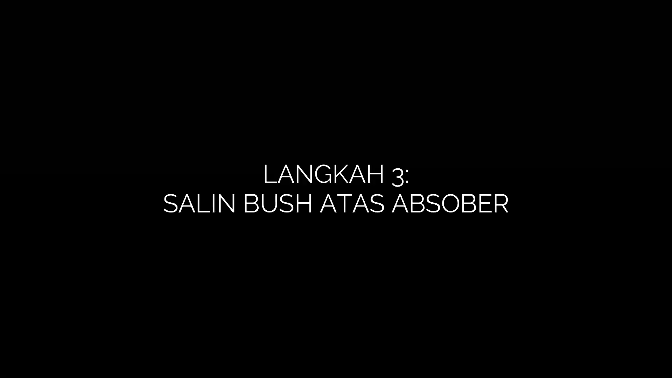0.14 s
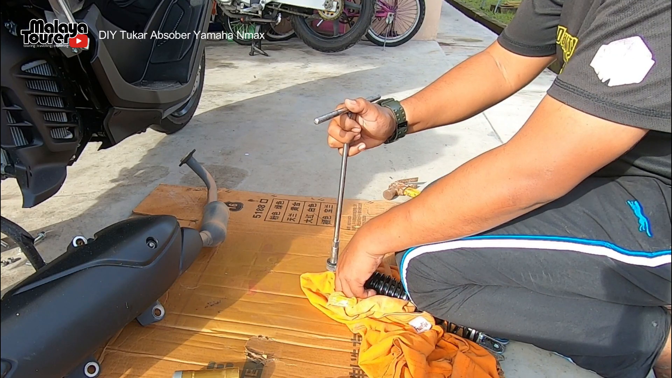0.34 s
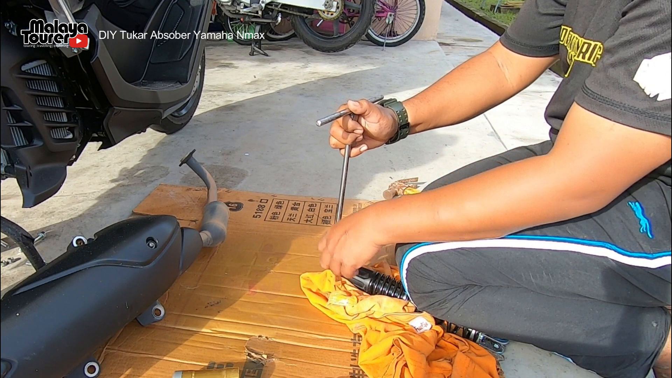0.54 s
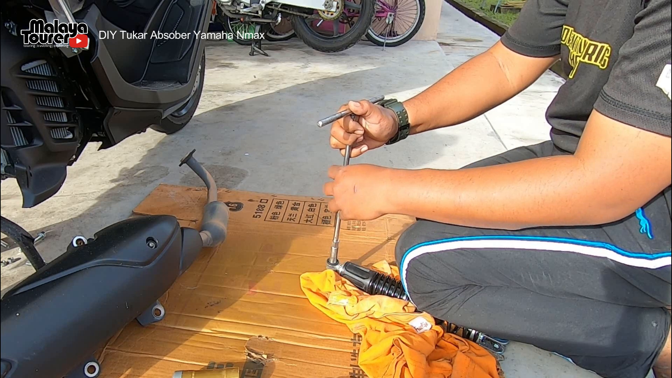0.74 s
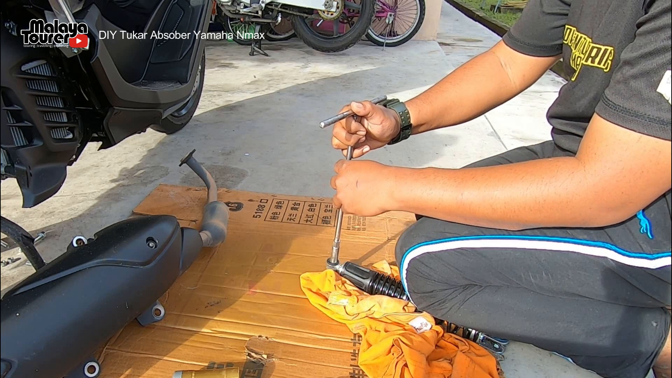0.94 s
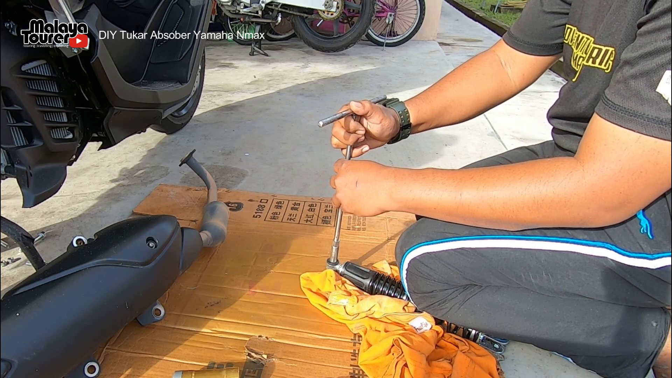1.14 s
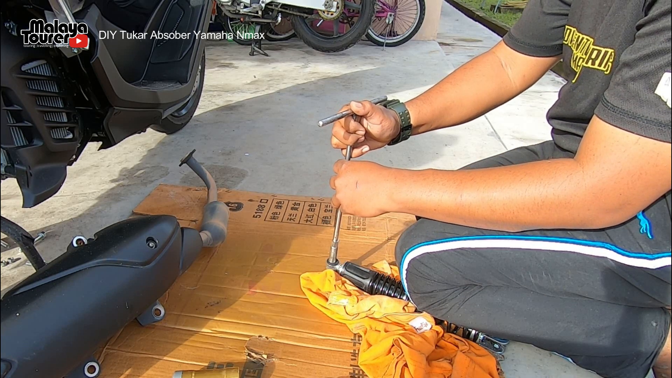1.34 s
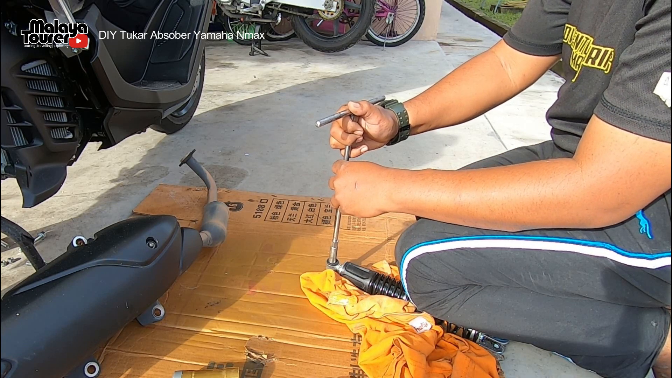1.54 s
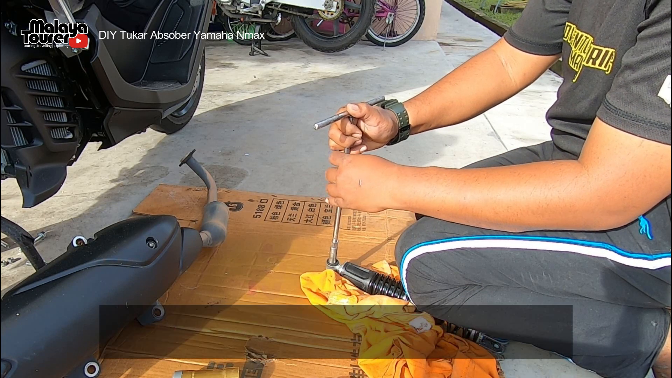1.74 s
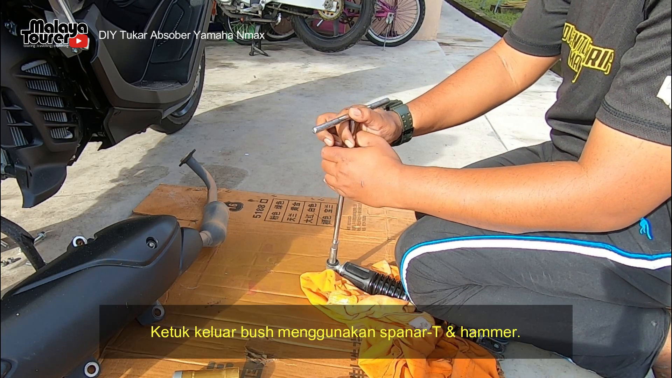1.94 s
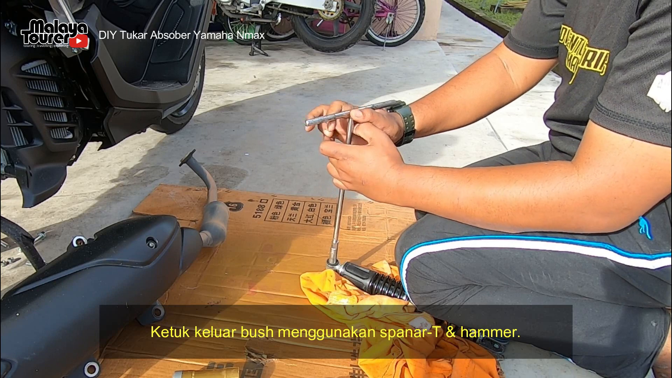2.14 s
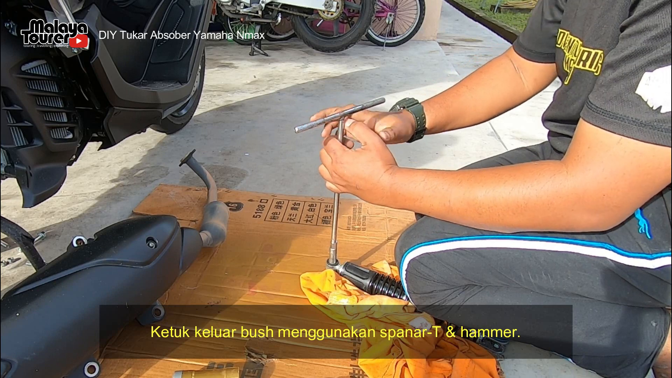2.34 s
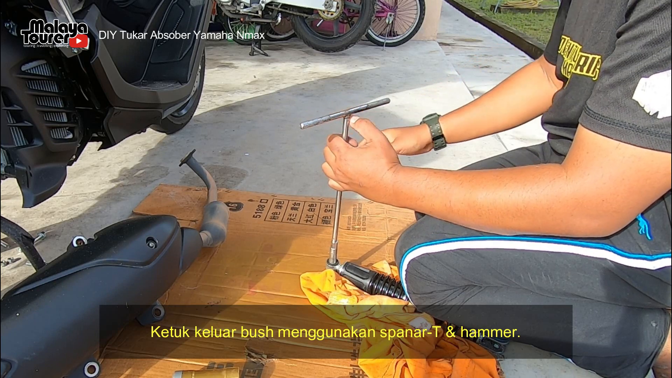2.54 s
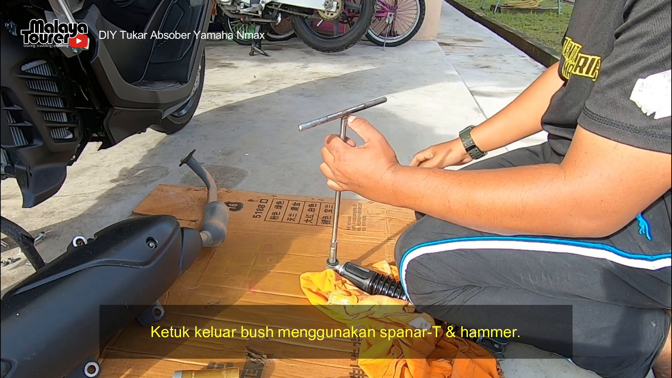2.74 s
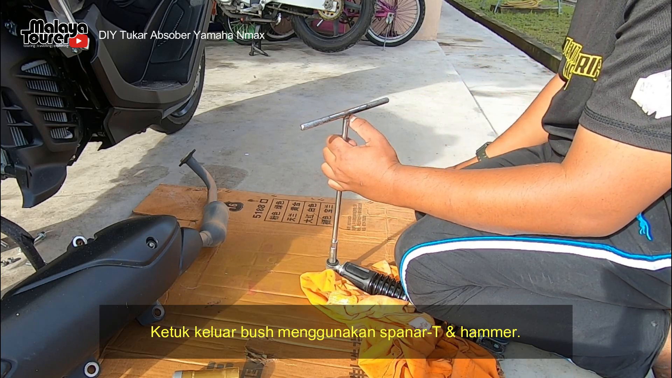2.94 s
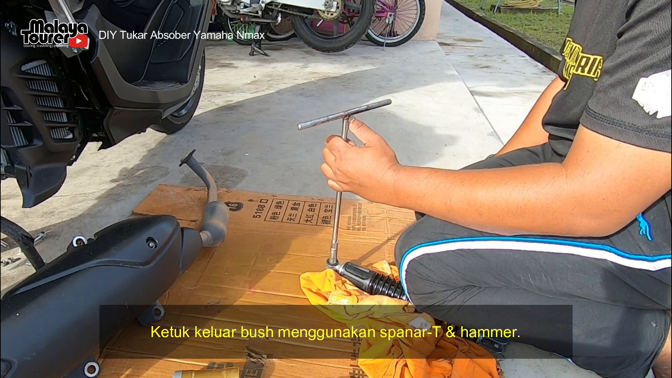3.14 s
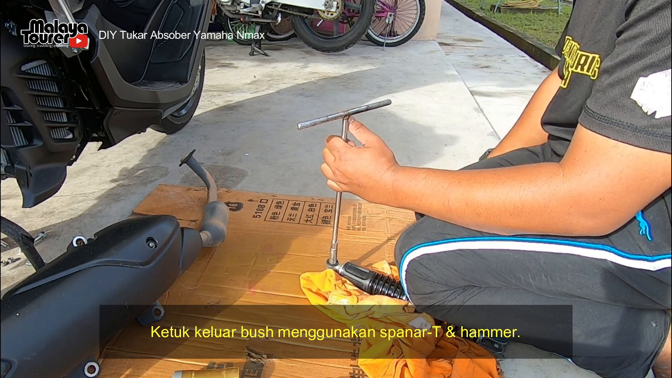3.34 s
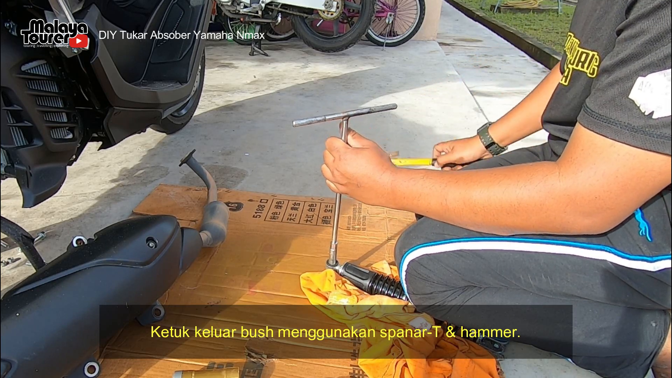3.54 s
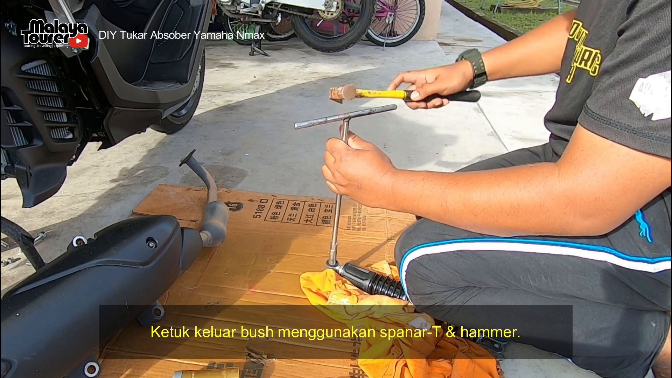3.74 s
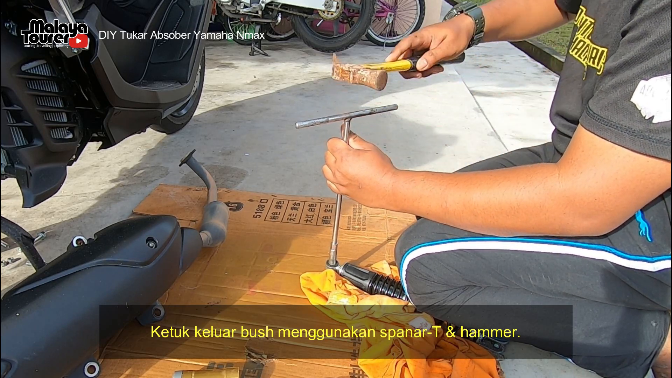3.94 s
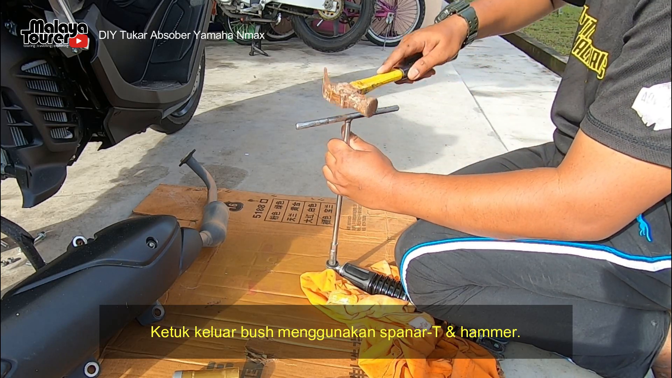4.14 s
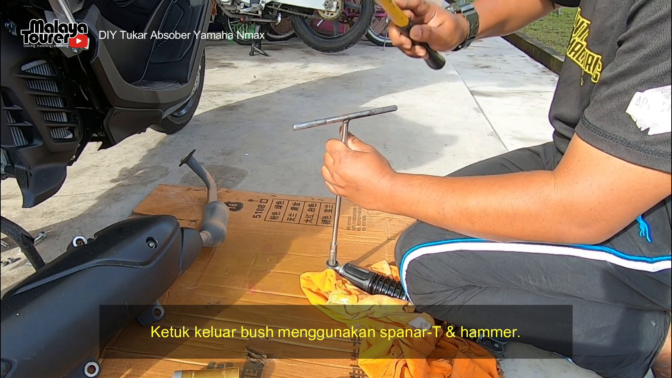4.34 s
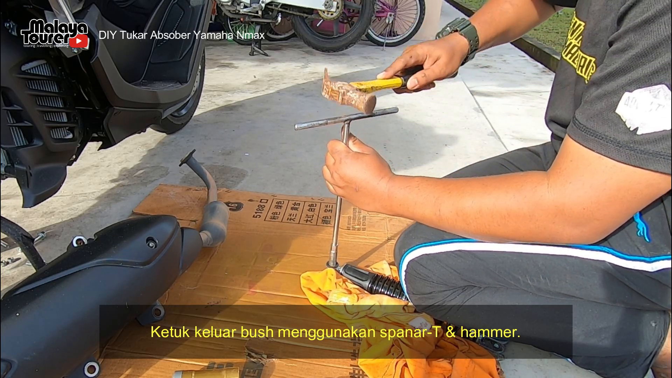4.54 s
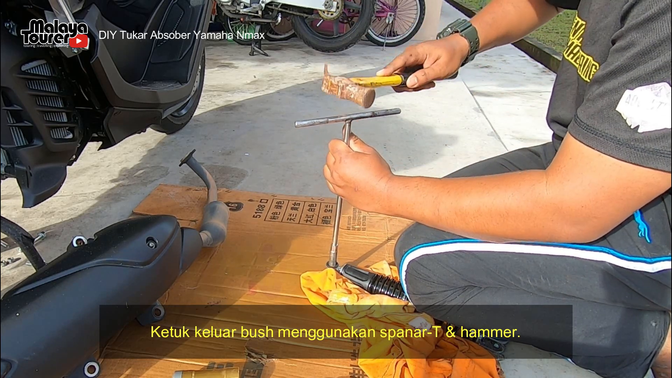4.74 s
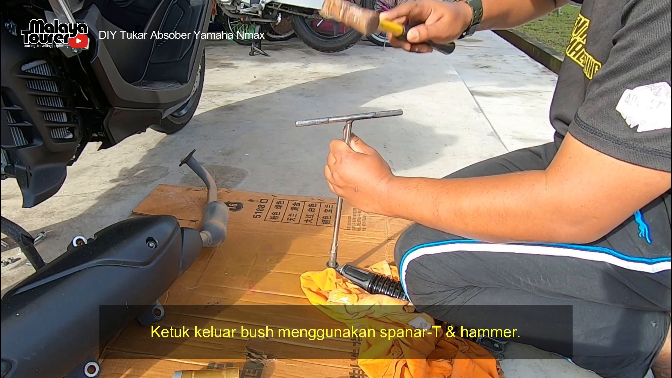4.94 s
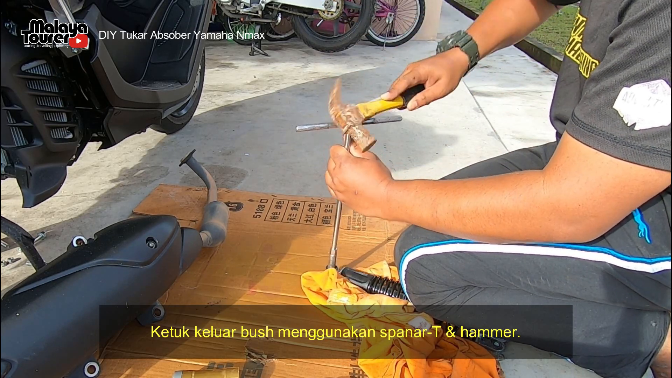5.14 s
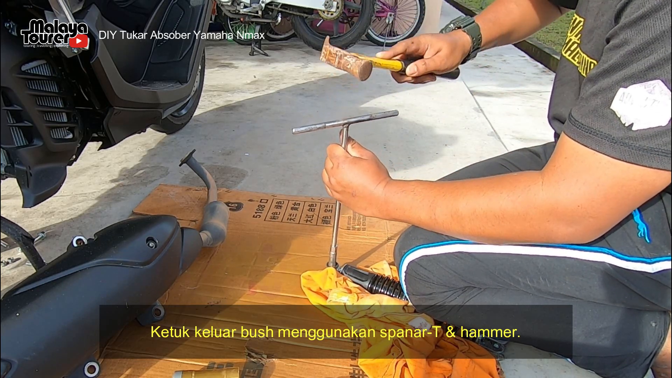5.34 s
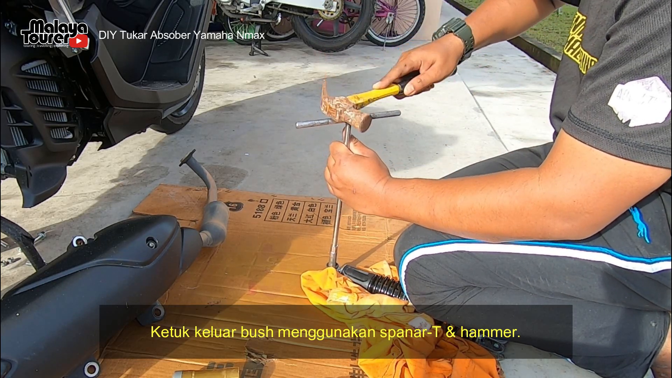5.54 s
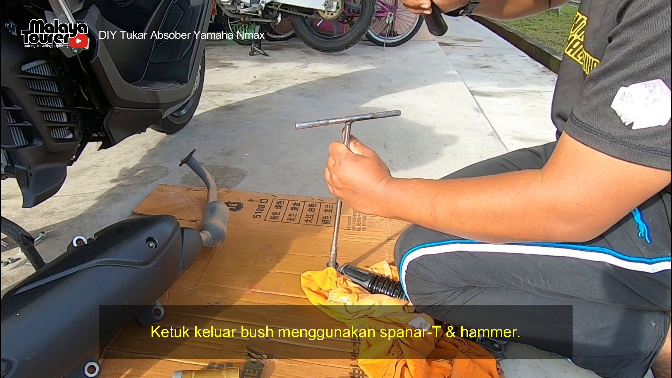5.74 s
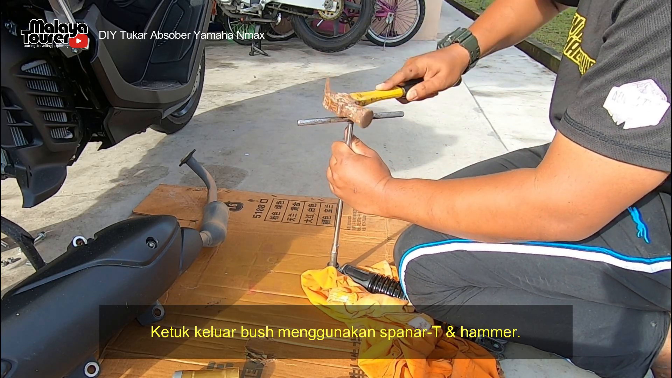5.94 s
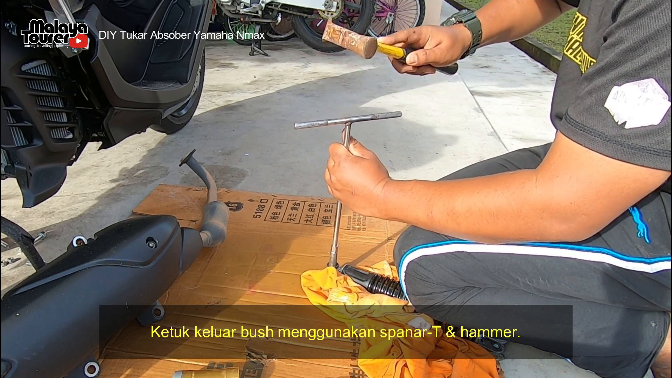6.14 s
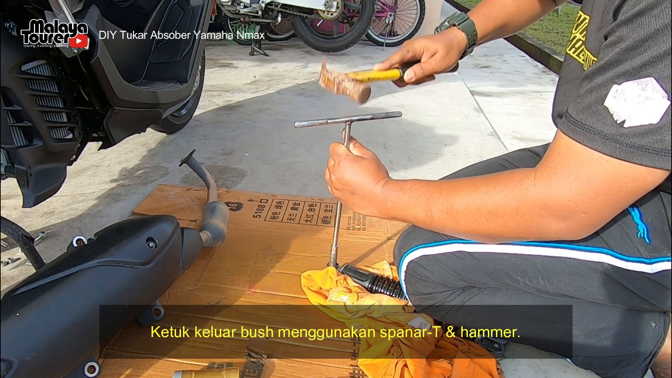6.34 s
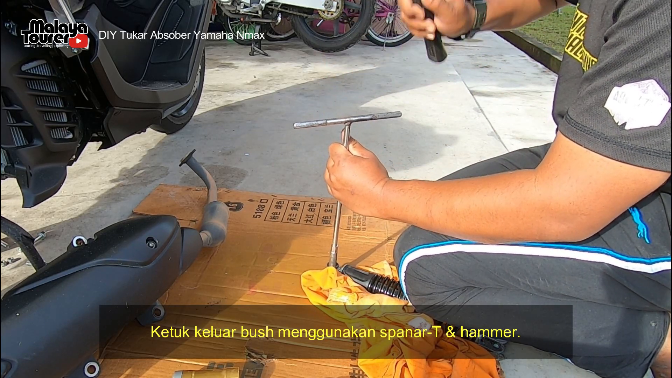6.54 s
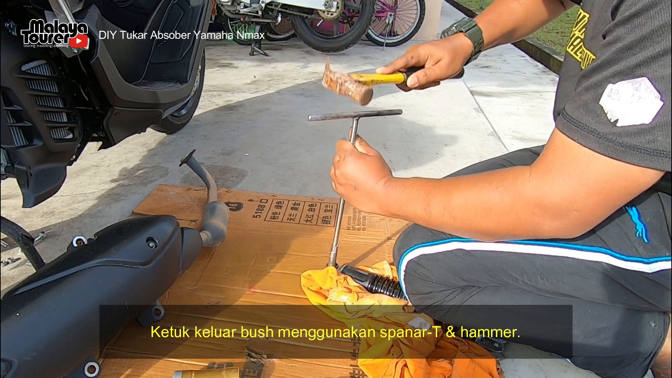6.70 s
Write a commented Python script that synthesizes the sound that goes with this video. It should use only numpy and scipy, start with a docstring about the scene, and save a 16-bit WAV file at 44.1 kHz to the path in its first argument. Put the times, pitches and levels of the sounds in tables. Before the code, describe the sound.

Outdoor repair work on a concrete porch by a street. Faint rustles of hands and cloth and dull tool knocks sit over steady engine rumble and tyre wash, with tiny bird and insect sounds. From the middle onward, eight sharp steel clinks alternate weak and strong, about three per second. Firm blows are very loud, right-weighted and limited, ducking the traffic and leaving long, level ringing tails.

```python
"""Traffic rumble and tyre wash (shaped noise) and a steady high sizzle run throughout, after a short silence.
A bird chirps twice (falling sines), an insect buzzes in swells (band noise), hands and tools tick and rustle.
Then a hammer taps a hand-held steel T-spanner eight times, lightly and firmly in turn, to drive a rubber
bush out of its eye: noise crack, damped modes, echoes, beating after-ring and a diffuse concrete-porch tail.
A limiter ducks each firm blow and recovers slowly, so its tail stays long and level."""
import sys
import numpy as np
from scipy import signal
from scipy.fft import rfft, irfft, next_fast_len
from scipy.io import wavfile

SR = 44100
rng = np.random.default_rng(int(sys.argv[2]) if len(sys.argv) > 2 else 0)


def wav_record(signal):
    """Record a signal, one row per channel, as 16-bit PCM in the file named by sys.argv[1]."""
    frames = np.transpose(np.atleast_2d(signal))
    bounded = np.clip(frames, -1, 1)
    # unit amplitude maps onto the largest positive 16-bit level
    quanta = np.round(bounded * 32767).astype(np.int16)
    wavfile.write(sys.argv[1], SR, quanta)


N = 302967

# traffic spectra, relative: (frequency [Hz], density [dB per Hz])
RUMBLE = [(20, -32), (35, -13.5), (55, -3), (78, 2.5), (98, -3), (120, 0.5), (148, -5), (185, 0),
          (240, -10), (350, -18.5), (600, -51), (1200, -76)]
WASH = [(200, 0), (400, 2.5), (600, 1.5), (850, -1.5), (1300, -10), (2200, -15), (3600, -18), (5500, -20.5),
        (8500, -27), (10300, -29.5), (11500, -44.5), (15000, -50)]
# vehicles passing far off: (nearest at [s], rumble lift [dB])
PASSES = [(.45, 2.5), (3.65, 2.5)]
# steady high noise bands: (centre [Hz], width [Hz], level [dB])
SIZZLE = [(6380, 660, -53.5), (7370, 780, -59.5), (9320, 800, -61)]
# swells of insect buzz: (centre time [s], length [s], level [dB])
BUZZ = [(.2, .1, -55), (.8, 0.3, -57), (1.2, 0.18, -61), (2.22, 0.27, -53.5), (3.453, 0.31, -54.5)]
# falling bird notes: (start [s], initial frequency [Hz], level [dB])
CHIRPS = [(.275, 6000, -50), (1.315, 6000, -49)]
# tool-handling ticks: (start [s], centre [Hz], level [dB])
TICKS = [(0.373, 650, -30), (.374, 3500, -46), (3.468, 800, -29.5), (3.535, 11800, -58)]
# hand and cloth rustles: (centre time [s], length [s], centre [Hz], level [dB])
RUSTLES = [(.92, 0.2, 2050, -54), (1.296, 0.13, 1390, -55), (1.927, 0.078, 2160, -54),
           (3.42, 0.2, 2000, -51)]
# hammer blows: (start [s], force [dB], contact brightness at 8 kHz [dB], pitch set by landing spot [Hz],
# its boost [dB], after-ring and tail [dB], crossbar ping [dB])
BLOWS = [(4.1763, 2.5, -9, 4220, 7, -3, -2), (4.5305, 17.5, 3.5, 4600, 0, -0.5, 1),
         (4.9048, 6.5, -5, 4100, -3.5, 0, -4), (5.2492, 20.5, 2, 3950, 0.5, -0.5, -1.5),
         (5.6455, 7, -2, 3900, -4.5, 0.5, -2.5), (5.9878, 24.5, 1.5, 3960, 1.5, 0, -2.5),
         (6.3725, 11, -2, 4100, 1.5, -0.5, 2.5), (6.7063, 19.5, 3.5, 3810, 6, -1.5, -2)]
# spanner and shock absorber modes, damped by hand and rubber:
# (frequency [Hz], direct level before blow colour [dB], t60 before DAMPING [s], excess over porch tail [dB])
SPANNER = [(271.8, -35, .15, 16.5), (454, -26, 0.07, -12), (550, -26.5, .035, -5), (986, -30.5, 0.095, 14),
           (1380, -30, 0.014, -1), (2100, -18.5, 0.014, -2.5), (2110, -34, 0.05, -3),
           (2337, -15, 0.0078, -11), (2680, -11, 0.011, 0), (3680, -6.5, 0.01, 2), (3730, -16, 0.05, 8),
           (3977, -7, 0.027, 9), (4297, -9, 0.013, -5), (4620, -8, 0.02, 5), (5076, -15.5, 0.053, 15),
           (5680, -10, 0.026, -12), (6530, -24.5, .025, 10), (6690, -19, 0.034, -7), (7500, -12, 0.053, 2),
           (9150, -30, 0.042, 9.5), (11650, -42, .04, 10), (11370, -28, 0.026, 0)]
# steel-on-steel crack, relative: (frequency [Hz], density [dB per Hz])
CRACK = [(200, -1.5), (700, -17), (1250, -3), (1650, -11.5), (2200, 1), (3000, -11.5), (3700, 2),
         (4300, -15), (5400, -8.5), (6600, -10.5), (8500, -21.5), (13000, -26.5), (16000, -46)]
# bare-steel after-ring modes: (frequency [Hz], level before RING_DB and blow colour [dB])
RING = [(972, -38), (1159, -43), (2046, -39), (2139, -41), (2585, -39), (3461, -38), (3515, -35),
        (3715, -36), (3765, -35), (3868, -34), (3902, -32), (3935, -35), (3974, -32), (4065, -35),
        (4245, -38), (4404, -37), (4533, -39), (4603, -35), (4785, -39), (5018, -30), (5071, -34),
        (5106, -35), (6492, -35), (6778, -40), (7736, -39), (7797, -41), (7838, -41), (9090, -48),
        (9130, -48), (10795, -52), (11190, -52), (11270, -51)]
# porch reverberation, relative: (frequency [Hz], density [dB per Hz], t60 [s])
PORCH = [(200, 4, 0.29), (580, 4, 0.27), (860, -9, 0.57), (1250, -3, 0.53), (2240, -4, 0.54),
         (3200, -2, 0.56), (3800, -0.5, 0.56), (5740, 0, 0.47), (7560, -2.5, 0.48), (10000, -11.5, 0.45),
         (10300, -22, 0.45), (12500, -20.5, 0.43), (14900, -48, 0.45)]
# first echoes from floor, walls and roof: (delay [s], level re direct [dB])
ECHOES = [(.0042, -36), (0.0127, -39), (0.0164, -12), (.0275, -24), (0.0293, -19)]
# left microphone port re right:
# (frequency [Hz], level [dB], phase lead [rad], likeness of diffuse sound [-1 to 1])
PORTS = [(55, -10.6, 0.0, .97), (125, -11.2, 0.0, .96), (205, -14.6, 0.0, .91), (370, -15.5, .6, .5),
         (550, -9, 2.6, .85), (1000, -1, 2.1, .93), (2100, -.5, 1.3, .78), (4000, -5, .55, .75),
         (6500, -14, .5, .35), (8500, -12, .6, .2), (11000, -4, .3, .2), (15000, -2, 0, .2)]

RUMBLE_DB, WASH_DB = -26, -37.5  # before passes and drift
PASS_HALF_WIDTH_S = 0.34
KNOCK_HZ, KNOCK_WIDTH_HZ, KNOCK_DB_PER_FORCE_DB = 2210, 650, 0.1241
DAMPING = 0.98  # divides SPANNER t60
PING_HZ, PING_WIDTH_HZ = 5060, 130  # crossbar mode cluster
RING_DB, RING_SPREAD_DB, RING_T60_S = 2, 2.5, .39
RING_BLUR_HZ = 7  # random spread of partials about each mode
SOUND_STARTS_S, CUTOFF_HZ = .207, 16400


def from_db(db):
    """Decibels to amplitude gain."""
    return 10 ** (np.asarray(db) / 20)


def unit_rms(x):
    """Scale to rms 1."""
    return x / np.sqrt(np.mean(x ** 2) + 1e-20)


def at_hz(table, hz):
    """Interpolate every table column on a log-frequency axis."""
    points, *columns = np.transpose(table)
    return [np.interp(np.log(hz + 1e-3), np.log(points), c) for c in columns]


def bins(size):
    """Bin frequencies [Hz] of a size-sample spectrum."""
    return np.fft.rfftfreq(size, 1 / SR)


def bell(x, centre, width):
    """Bell curve of height 1."""
    return np.exp(-((x - centre) / width) ** 2)


def add(track, start_s, sound):
    """Mix a sound into a track, cut at the end."""
    start = round(start_s * SR)
    part = sound[..., :N - start]
    track[..., start:start + part.shape[-1]] += part


def diffuse(gain, size):
    """Stereo noise of given spectral gain; mid/side balance sets the likeness of the two ports."""
    alike = np.clip(at_hz(PORTS, bins(size))[2], 0, 1)
    mid, side = rfft(rng.standard_normal((2, size)))
    common = np.sqrt((1 + alike) / 2) * mid
    opposed = np.sqrt((1 - alike) / 2) * side * [[1], [-1]]
    return irfft(gain * (common + opposed), size)


def hump(hz, width_hz, size):
    """Noise in one bell-shaped band, rms 1."""
    return unit_rms(diffuse(np.exp(-2 * ((bins(size) - hz) / width_hz) ** 2), size))


def drift(knots_per_s):
    """Random wander: straight lines between normal knots of spread 1."""
    knots = rng.standard_normal(1000)
    return np.interp(np.arange(N) / SR * knots_per_s, np.arange(len(knots)), knots)


def traffic(throb_db=0.88, waver_db=1.1, wash_share=0.53):
    """Far engine rumble under tyre wash: shaped noises of drifting level, swelling as vehicles pass."""
    t = np.arange(N) / SR
    lift_db = sum(peak_db / (1 + ((t - s) / PASS_HALF_WIDTH_S) ** 2) for s, peak_db in PASSES)
    rumble = unit_rms(diffuse(from_db(at_hz(RUMBLE, bins(N))[0]), N))
    wash = unit_rms(diffuse(from_db(at_hz(WASH, bins(N))[0]), N))
    rumble_db = RUMBLE_DB + lift_db + throb_db * drift(18)
    wash_db = WASH_DB + wash_share * lift_db + waver_db * drift(12.0)
    return rumble * from_db(rumble_db) + wash * from_db(wash_db)


def garden(buzz_hz=7620, buzz_width_hz=480, chirp_s=0.036, chirp_fall=0.076):
    """Steady band-noise sizzle, swelling band-noise insect buzz and sine bird notes gliding down."""
    t = np.arange(N) / SR
    out = sum(from_db(level_db) * hump(hz, width_hz, N) for hz, width_hz, level_db in SIZZLE)
    swell = sum(from_db(level_db) * np.exp(-2 * ((t - s) / length_s) ** 2) for s, length_s, level_db in BUZZ)
    out += swell * hump(buzz_hz, buzz_width_hz, N)
    along = np.linspace(0, 1, round(chirp_s * SR))
    for s, hz, level_db in CHIRPS:
        phase = 2 * np.pi * np.cumsum(hz * (1 - chirp_fall * along)) / SR
        add(out, s, from_db(level_db) * np.sin(np.pi * along) * np.sin(phase))
    return out


def handling(t60_s=0.064, tick_width_hz=1100, rustle_width_hz=550, touch_s=.0006):
    """Decaying noise ticks of tools and bell-shaped noise swells of fingers and cloth."""
    out, t = np.zeros((2, N)), np.arange(SR // 10) / SR
    for s, hz, level_db in TICKS:
        envelope = from_db(level_db - 60 * t / t60_s) * (1 - np.exp(-t / touch_s))
        add(out, s, hump(hz, tick_width_hz, len(t)) * envelope)
    for s, length_s, hz, level_db in RUSTLES:
        swell = bell(np.arange(N) / SR, s, length_s)
        out += from_db(level_db) * swell * hump(hz, rustle_width_hz, N)
    return out


def porch(tail_db=-21.5, build_s=0.0097):
    """Diffuse tail of a blow: spanner sound radiated all round returns as noise with modal humps."""
    size = SR
    t, hz = np.arange(size) / SR, bins(size)
    # a mode is wider the sooner it dies
    humps = sum(from_db(over_db) ** 2 / (1 + (2 * np.pi * (hz - mode_hz) * t60_s / np.log(1000)) ** 2)
                for mode_hz, _, t60_s, over_db in SPANNER)
    gain = from_db(at_hz(PORCH, hz)[0]) * np.sqrt(1 + humps)
    noise = rfft(unit_rms(diffuse(gain, size)))
    edges_hz = [0, 700, 3000, 5500, 7000, 9000, 12000, SR / 2]
    tail = np.zeros((2, size))
    for low, high in zip(edges_hz, edges_hz[1:]):
        t60_s = at_hz(PORCH, (low + high) / 2)[1]
        band = irfft(noise * ((hz >= low) & (hz < high)), size)
        tail += band * from_db(-60 * t / t60_s)
    return from_db(tail_db) * tail * np.clip(t / build_s, 0, 1) ** 2


def contact_tilt(hz, bright_db):
    """Treble tilt [dB]: harder contact is brighter."""
    return bright_db * np.minimum(hz / 8000, 1.5) ** 1.5


def ring_colour(hz, bright_db, favoured_hz, boost_db, after_db, ping_db, favoured_width_hz=220):
    """After-ring and tail colour [dB]: the landing spot weights one mode cluster and the crossbar ping."""
    spot_db = boost_db * bell(hz, favoured_hz, favoured_width_hz)
    crossbar_db = ping_db * bell(hz, PING_HZ, PING_WIDTH_HZ)
    return after_db + contact_tilt(hz, bright_db) + spot_db + crossbar_db


def ring(colour, count=3):
    """Bare-steel after-ring: each mode is a few close partials that beat, of new strength each blow."""
    hz, mode_db = np.transpose(RING)
    spread_db = RING_SPREAD_DB * rng.standard_normal(len(hz))
    level = from_db(RING_DB + mode_db + ring_colour(hz, *colour) + spread_db)
    # bins are 1 Hz apart
    partials = np.round(hz + RING_BLUR_HZ * rng.standard_normal((count, len(hz)))).astype(int)
    phase = np.exp(2j * np.pi * rng.random(partials.shape))
    spectrum = np.zeros(SR // 2 + 1, complex)
    np.add.at(spectrum, partials, level / np.sqrt(count) * phase)
    return irfft(spectrum, SR) * SR / 2 * from_db(-60 * np.arange(SR) / SR / RING_T60_S)


def modes(hz, level_db, t60_s, size):
    """Sum of decaying sines with alternating signs."""
    t = np.arange(size) / SR
    amplitude = from_db(level_db) * (-1) ** np.arange(len(hz))
    return amplitude @ (np.sin(2 * np.pi * hz[:, None] * t) * from_db(-60 * t / t60_s[:, None]))


def clink(force_db, bright_db, crack_db=-7.0, fade_t60_s=0.024, contact_s=0.00043, spread_db=2.5):
    """Direct blow: noise crack and damped modes, both rising with the hammer's contact time constant."""
    size = SR // 4
    t, (hz, mode_db, t60_s, _) = np.arange(size) / SR, np.transpose(SPANNER)
    # firmer blows knock harder
    knock_db = KNOCK_DB_PER_FORCE_DB * force_db * bell(bins(size), KNOCK_HZ, KNOCK_WIDTH_HZ)
    colour_db = contact_tilt(bins(size), bright_db) + knock_db
    level_db = mode_db + np.interp(hz, bins(size), colour_db) + spread_db * rng.standard_normal(len(hz))
    body = modes(hz, level_db, t60_s / DAMPING, size)
    # the phase of fading noise keeps the burst brief; its magnitude is flat before shaping
    fade = from_db(-60 * t / fade_t60_s)
    phase = np.angle(rfft(rng.standard_normal(size) * fade))
    burst = np.exp(1j * phase) * np.linalg.norm(fade)
    shape = unit_rms(from_db(at_hz(CRACK, bins(size))[0])) * from_db(crack_db + colour_db)
    crack = irfft(burst * shape, size) * fade ** 0.16
    return (body + crack) * (1 - np.exp(-t / contact_s))


def hammer(shift_rad=0.868):
    """Each blow arrives directly, then as hard echoes; the steel rings on over a diffuse tail."""
    out, tail_a, tail_b = np.zeros((2, N)), rfft(porch()), rfft(porch())
    for k, (s, force_db, *colour) in enumerate(BLOWS):
        direct = from_db(force_db) * clink(force_db, colour[0])
        add(out, s, direct)
        for delay_s, level_db in ECHOES:
            add(out, s + delay_s, from_db(level_db) * direct)
        add(out, s, from_db(force_db) * ring(colour))
        # the spanner shifts in the hand, so the tail's fine pattern changes from blow to blow
        tail = np.cos(k * shift_rad) * tail_a + np.sin(k * shift_rad) * tail_b
        tail_gain = from_db(force_db + ring_colour(bins(SR), *colour))
        add(out, s, irfft(tail * tail_gain, SR))
    return out


def scene():
    """Street, garden, handling and the hammering in the porch."""
    return traffic() + garden() + handling() + hammer()


def ports(x):
    """The left port faces away: shaded and shifted in phase."""
    size = next_fast_len(N + SR // 10)
    level_db, lead_rad, _ = at_hz(PORTS, bins(size))
    left = rfft(x[0], size) * from_db(level_db) * np.exp(1j * lead_rad)
    return np.array([irfft(left, size)[:N], x[1]])


def released(over_db, db_per_s):
    """Catch each peak and let it fall at a steady rate."""
    fall_db = db_per_s * np.arange(N) / SR
    return np.maximum.accumulate(over_db + fall_db) - fall_db


def limiter(x, threshold_db=-0.5, fast_db_per_s=85, slow_db_per_s=14, slow_share=0.55, attack_s=0.0009):
    """Peaks cut the gain; part returns quickly, the rest slowly, so the street ducks after firm blows."""
    over_db = np.maximum(20 * np.log10(np.abs(x).max(axis=0) + 1e-9) - threshold_db, 0)
    fast_db = released(over_db, fast_db_per_s)
    slow_db = released(slow_share * over_db, slow_db_per_s)
    pole = np.exp(-1 / (attack_s * SR))
    cut_db = signal.lfilter([1 - pole], [1, -pole], np.maximum(fast_db, slow_db))
    ahead = SR // 1000  # 1 ms look-ahead
    return x * from_db(-np.pad(cut_db[ahead:], (0, ahead), mode="edge"))


def record(dry):
    """Two ports, limiter, initial silence, rounded peaks and a steep top cut."""
    x = limiter(ports(dry)) * (np.arange(N) / SR > SOUND_STARTS_S)
    x = x / (1 + x ** 6) ** (1 / 6)
    return signal.sosfilt(signal.cheby2(14, 70, CUTOFF_HZ, fs=SR, output="sos"), x)


dry = scene()
out = record(dry)
wav_record(out)
```